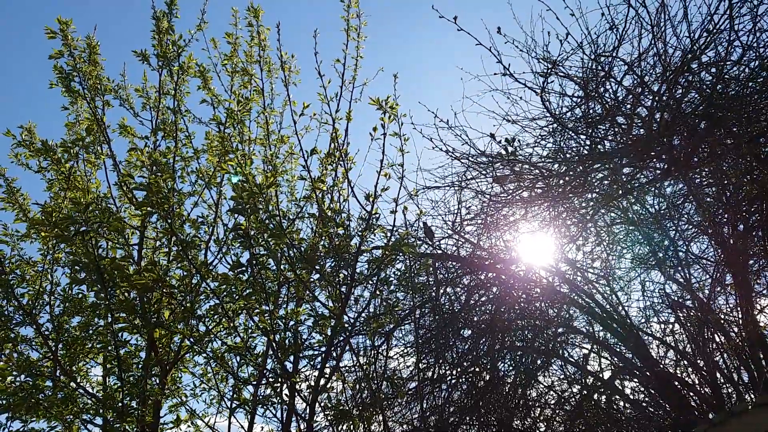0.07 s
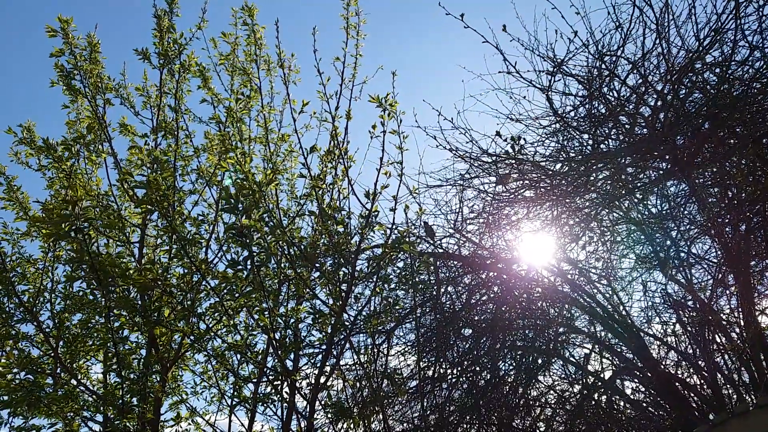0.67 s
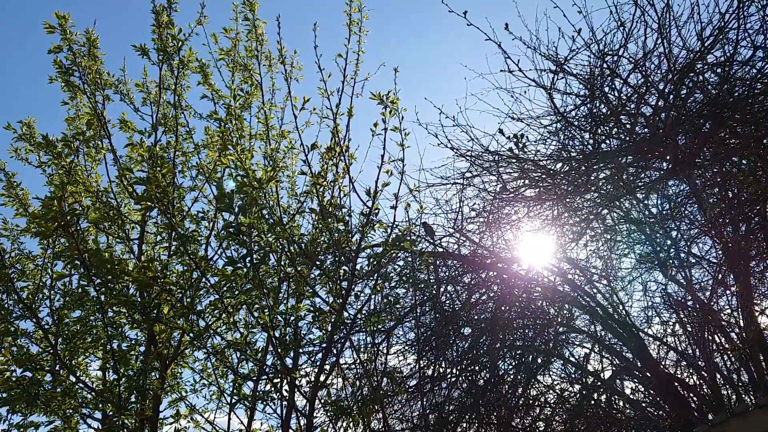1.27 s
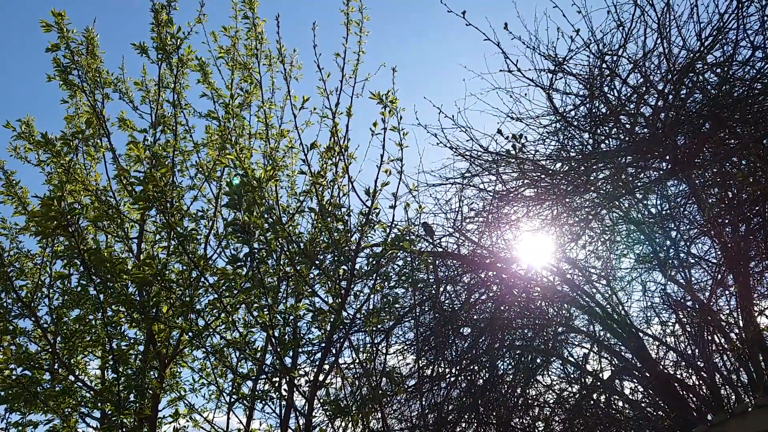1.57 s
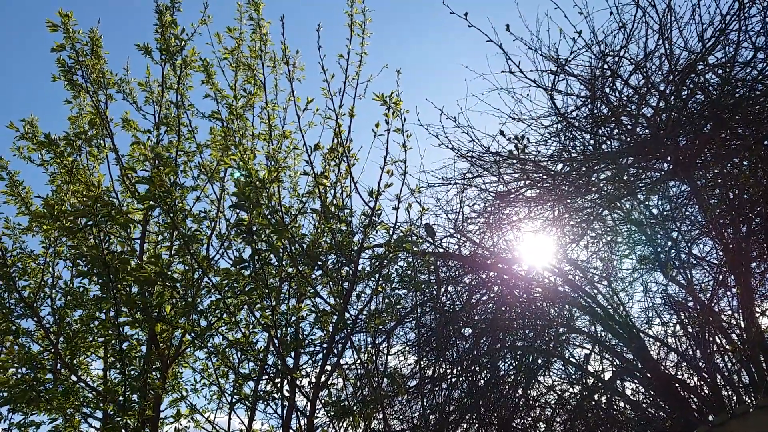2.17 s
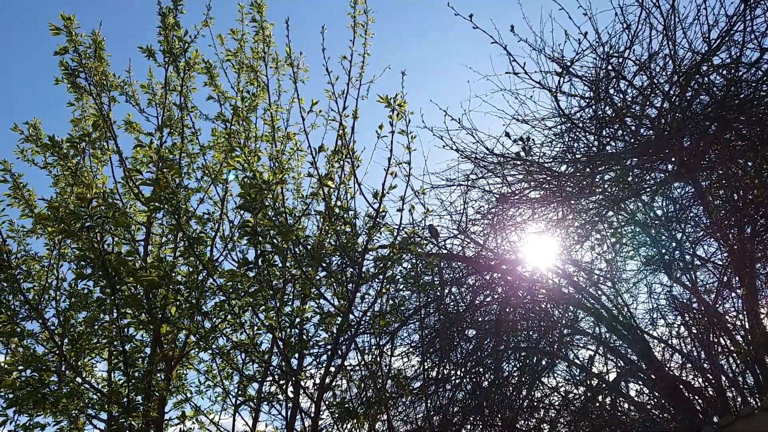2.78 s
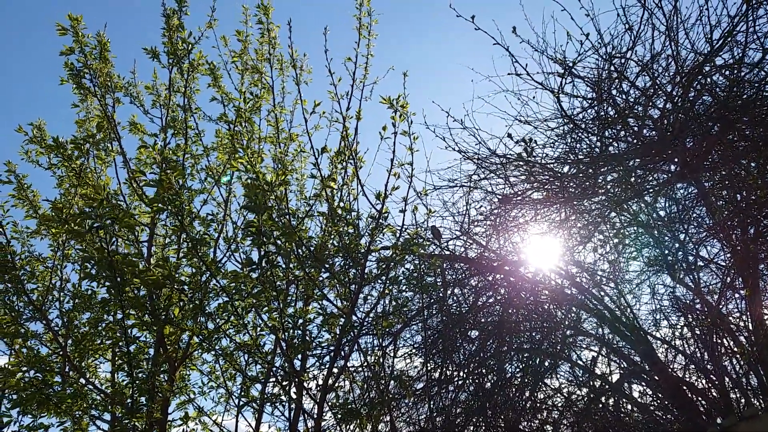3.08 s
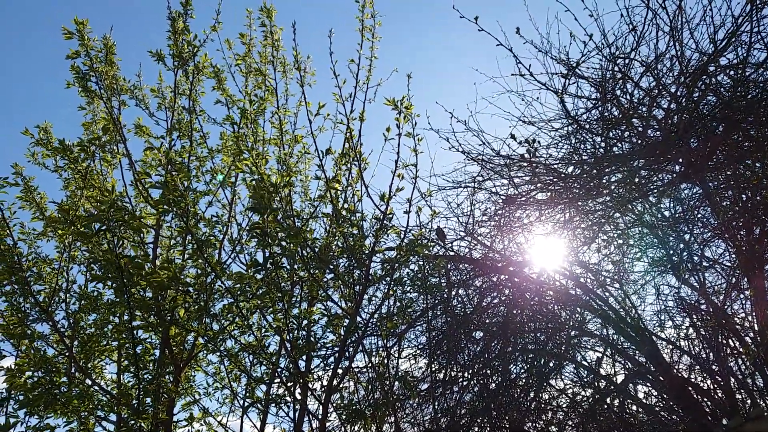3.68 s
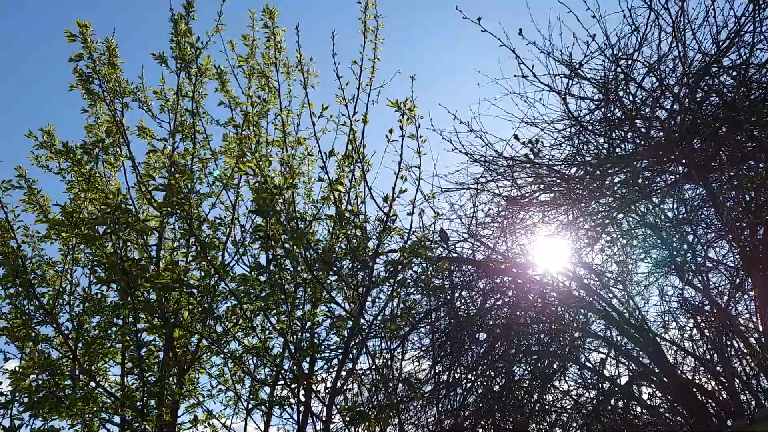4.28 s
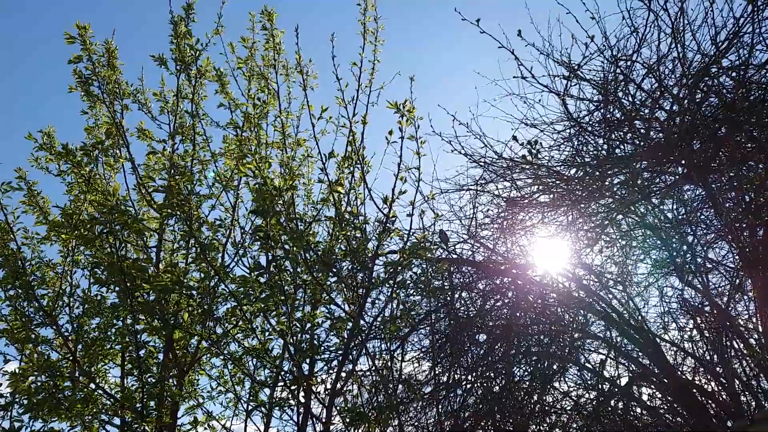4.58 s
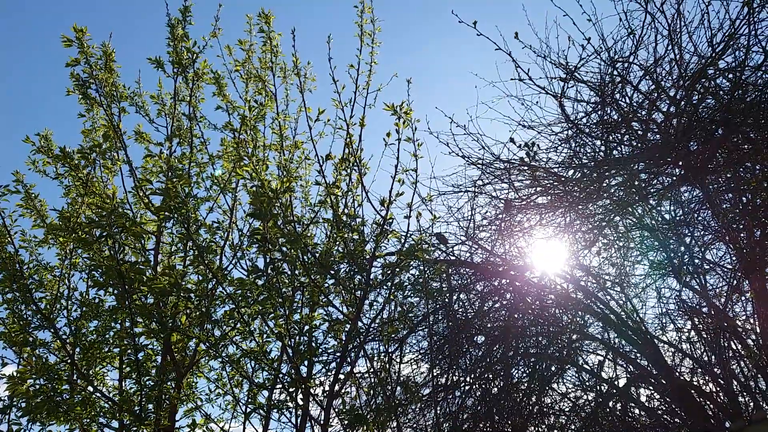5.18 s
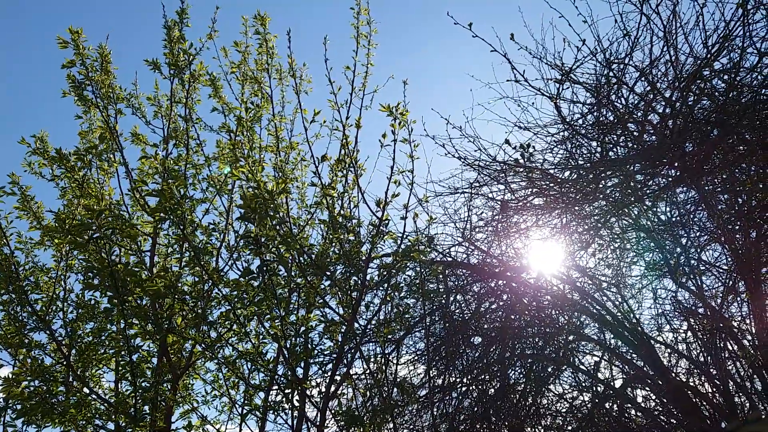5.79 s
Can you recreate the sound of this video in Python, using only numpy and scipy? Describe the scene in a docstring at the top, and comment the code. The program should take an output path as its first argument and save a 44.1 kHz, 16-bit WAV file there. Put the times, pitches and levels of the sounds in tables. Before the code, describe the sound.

A close bird gives two loud, thin, buzzy calls, with faint water drips, distant chirps and light wind in a garden.

```python
"""A garden. A bird close on the right gives two loud, thin calls, each a falling buzz, an arched whistle
and a harder buzz; a flutter in its throat chops the tone, and leaves and branches scatter it.
Other birds chirp farther off. Water drips and splashes faintly: drops tick, trapped bubbles ring.
Light wind rumbles on the left microphone over a low outdoor hush."""
import sys
import numpy as np
from scipy import signal
from scipy.fft import rfft, irfft, next_fast_len
from scipy.io import wavfile
from scipy.ndimage import uniform_filter1d

SR = 44100
rng = np.random.default_rng(int(sys.argv[2]) if len(sys.argv) > 2 else 0)


def to_wav(sig):
    """Store sig (one row per channel, or 1-D mono) as 16-bit WAV at the path in sys.argv[1].

    Samples outside -1..1 are clipped; the rate is SR.
    """
    pcm = np.clip(np.atleast_2d(sig), -1, 1) * 32767
    pcm = np.round(pcm).astype(np.int16)
    wavfile.write(sys.argv[1], SR, pcm.T)  # frames by channels


N = 261954
TIME = np.arange(N) / SR


def amp(db):
    """Decibels to gain."""
    return 10 ** (np.asarray(db) / 20)


def unit(x):
    """Scale to rms 1."""
    return x / np.sqrt(np.mean(x ** 2) + 1e-20)


def lookup(points, hz):
    """Interpolate a table on a log-frequency axis."""
    table_hz, value = np.transpose(points)
    return np.interp(np.log(hz + 1), np.log(table_hz + 1), value)


def colour(x, points):
    """Filter by a table of (frequency [Hz], gain [dB])."""
    size = next_fast_len(x.shape[-1] + 4096)
    gain = amp(lookup(points, np.fft.rfftfreq(size, 1 / SR)))
    return irfft(rfft(x, size) * gain, size)[..., :x.shape[-1]]


def add(mix, start_s, sound):
    """Mix a sound in at start_s."""
    part = mix[max(round(start_s * SR), 0):][:len(sound)]
    part += sound[:len(part)]


def drift(t, max_hz):
    """Smooth random wander, rms about 1."""
    hz, phase = max_hz * rng.uniform(.2, 1, (12, 1)), rng.random((12, 1))
    return np.sin(2 * np.pi * (hz * t + phase)).sum(0) / np.sqrt(6)


def ring(x, hz, width_hz):
    """One resonance."""
    return signal.lfilter(*signal.iirpeak(hz, hz / width_hz, SR), x)


def burst(decay_s):
    """Exponentially decaying noise."""
    return rng.standard_normal(1024) * np.exp(-TIME[:1024] / decay_s)


def impulses(per_s, spread_db):
    """Randomly timed impulses of uneven size."""
    sizes = amp(spread_db * np.minimum(rng.exponential(1, N), 3))
    return sizes * (rng.random(N) < per_s / SR)


def scatter(x, t60_table, delay_s, taps_per_s):
    """Echoes off branches: sparse taps that decay band by band."""
    taps = rng.standard_normal(SR) * (rng.random(SR) < taps_per_s / SR) * (TIME[:SR] > delay_s)
    hz, t, bands = signal.stft(taps, SR, nperseg=256)
    decay = amp(-60 * t / lookup(t60_table, hz)[:, None])
    tail = signal.istft(bands * decay, SR, nperseg=256)[1]
    return signal.fftconvolve(x, tail / np.linalg.norm(tail))[:N]


# left microphone relative to right: (frequency [Hz], gain [dB])
LEFT_SHADE = [(300, 9.5), (1000, -1.5), (2000, -21), (3000, -25), (4000, -13), (5600, -9), (6400, -36.5),
              (7000, -33), (8000, -8.5), (12000, -12), (16000, -16)]
# decay of tree echoes: (frequency [Hz], T60 [s])
TREE_T60 = [(500, 0.69), (3000, 0.38), (7000, 0.39), (14000, 0.26)]
def garden(x, near_db, far_db, left_far_db, near_t60_s=.023, right_lag_samples=13):
    """A source on the right: near twigs echo at once, farther trees from all sides."""
    near = [x + amp(near_db) * scatter(x, [(1000, near_t60_s)], delay_s=.0007, taps_per_s=1500)
            for _ in range(2)]
    far = [amp(far_db) * scatter(x, TREE_T60, delay_s=.013, taps_per_s=3000) for _ in range(2)]
    left = colour(near[0], LEFT_SHADE) + amp(left_far_db) * far[0]
    right = np.pad(near[1] + far[1], (right_lag_samples, 0))[:N]
    return np.array([left, right])


# outdoor noise spectrum: (frequency [Hz], gain [dB])
HUSH_SPECTRUM = [(100, 20.5), (250, -3), (500, 3.5), (950, 5), (1500, -0.5), (2500, -6.5), (4000, -16.5),
                 (5500, -18), (7000, -27.5), (8300, -47.5), (10000, -16.5), (15500, -22)]
def hush(level_db=-58, shared=.15, swell_db=1):
    """Distant outdoor noise, gently swelling."""
    noise = unit(colour(rng.standard_normal((3, N)), HUSH_SPECTRUM))
    left, right, both = noise * amp(level_db + swell_db * drift(TIME, 3.9))
    return np.array([left, right]) + shared * both


# turbulence spectrum: (frequency [Hz], gain [dB])
WIND_SPECTRUM = [(15, 0.5), (25, 1.5), (41, -1), (55, -5), (70, -18), (84, -14.5), (94, -4), (106, -13.5),
                 (135, -19), (165, -18.5), (250, -20.5), (400, -24), (900, -71)]
# turbulence on the left microphone: (time [s], level [dB])
WIND_LEVELS = [(0, -43.5), (.3, -52.5), (1.4, -45.5), (1.9, -47), (3.2, -48), (4.5, -48), (5.5, -47.5),
               (5.94, -47)]
# brief buffets: (time [s], envelope peak [dB], pitch [Hz])
WIND_BUFFETS = [(0.013, -30, 95), (0.666, -34.5, 49), (0.946, -34, 86), (1.765, -26, 76),
                (2.591, -31.5, 44.9), (4.104, -31.5, 45), (4.245, -30.5, 48), (5.456, -29, 50),
                (5.543, -29, 84.6)]
def wind(right_db=-14, buffet_sigma_s=.0038):
    """Low turbulence and short buffets, mostly on the left microphone."""
    turbulence = unit(colour(rng.standard_normal((2, N)), WIND_SPECTRUM))
    left, right = turbulence * amp(np.interp(TIME, *np.transpose(WIND_LEVELS)))
    for centre_s, db, hz in WIND_BUFFETS:
        t = TIME - centre_s
        left += amp(db) * np.exp(-.5 * (t / buffet_sigma_s) ** 2) * np.sin(2 * np.pi * hz * t)
    return np.array([left, amp(right_db) * right])


def thin_whistle(start_s=.0013, length_s=.2, hz=9200, db=-60, fade_db=-14, jitter=.0049):
    """A faint, very high whistle that holds its pitch and fades."""
    out, t = np.zeros(N), np.arange(0, length_s, 1 / SR)
    phase = 2 * np.pi * np.cumsum(hz * (1 + jitter * drift(t, 200))) / SR
    envelope = amp(db + fade_db * t / length_s) * signal.windows.tukey(len(t), .1)
    add(out, start_s, envelope * np.sin(phase))
    return np.array([colour(out, LEFT_SHADE), out])


# three-note phrase: (offset [s], length [s], start [Hz], middle [Hz], end [Hz], relative level [dB])
PHRASE_NOTES = [(0, .053, 2360, 2890, 3340, -48), (0.01, .08, 4050, 4500, 4090, -50),
                (.026, .108, 3150, 3790, 2530, -40.5)]
# each time it is sung: (time [s], gain [dB])
PHRASE_STARTS = [(1.899, -1), (3.657, -3)]
def phrase_notes():
    """A far bird sings one phrase twice."""
    return [(start_s + offset_s, *shape, db + gain_db)
            for start_s, gain_db in PHRASE_STARTS for offset_s, *shape, db in PHRASE_NOTES]


# quick chips: (time [s], relative level [dB])
TWITTER_CHIPS = [(4.964, -56), (4.997, -58), (5.089, -58), (5.134, -58), (5.196, -55), (5.241, -60),
                 (5.294, -47), (5.39, -52.5), (5.427, -62), (5.49, -56), (5.54, -55.5)]
def twitter_notes(length_s=.0205, first_hz=2358, climb_hz_per_s=433, sweep=.184):
    """Falling chips, each pitched a little above the last."""
    notes = []
    for start_s, db in TWITTER_CHIPS:
        hz = first_hz + climb_hz_per_s * (start_s - TWITTER_CHIPS[0][0])
        notes.append((start_s, length_s, hz * (1 + sweep), hz, hz * (1 - sweep), db))
    return notes


# far birds' slurs and, at .047 and .123 s, short rising plips of water drops:
# (time [s], length [s], start [Hz], end [Hz], relative level [dB])
SLURS_AND_PLIPS = [(.047, 0.005, 880, 1680, -34.5), (.068, 0.026, 3680, 1936, -44),
                   (.123, .015, 880, 1385, -35), (.154, 0.031, 3220, 2110, -51),
                   (.266, 0.067, 3505, 4510, -49.5), (.328, 0.043, 3240, 4540, -43),
                   (.345, .039, 2940, 2390, -40), (.635, 0.067, 3060, 4290, -49),
                   (.994, .07, 1923, 3166, -53), (1.067, 0.034, 2960, 2220, -53),
                   (1.383, 0.054, 2234, 3100, -48.5), (1.666, 0.028, 2580, 2110, -43.5),
                   (2.343, 0.062, 3304, 2810, -54), (2.476, .1, 3090, 2920, -63.5),
                   (4.15, .022, 1760, 2330, -43.5), (4.8, 0.0292, 968, 1640, -55),
                   (4.845, 0.015, 2370, 1620, -40.5), (5.592, 0.14, 4070, 4000, -66.5)]
# faint bird chatter: (time [s], length [s], relative level [dB])
CHATTER_BOUTS = [(0.217, .52, -57), (0.785, .34, -60.5), (4.42, .22, -64)]
def glide_notes(chatter_per_s=30, note_s=.045, low_hz=2193, high_hz=4304, max_sweep=.15, arch=1.03):
    """Slightly arched glides: bird slurs, water plips and bouts of random chatter."""
    glides = list(SLURS_AND_PLIPS)
    for bout_s, length_s, db in CHATTER_BOUTS:
        for slot_s in np.arange(bout_s, bout_s + length_s, 1 / chatter_per_s):
            late, pitch, slope = rng.random(3)
            hz = low_hz * (high_hz / low_hz) ** pitch
            sweep = max_sweep * (2 * slope - 1)
            glides.append((slot_s + late / chatter_per_s, note_s, hz * (1 - sweep), hz * (1 + sweep), db))
    return [(start_s, length_s, start_hz, arch * (start_hz + end_hz) / 2, end_hz, db)
            for start_s, length_s, start_hz, end_hz, db in glides]


def far_birds_and_plips(octave_db=-30, faint_db=-56, clear_db=-40, jitter=.018):
    """Far birds' whistles and rising plips of water drops; the trees blur fainter notes more."""
    clear, blurred = np.zeros((2, N))
    for start_s, length_s, *pitches_hz, db in phrase_notes() + twitter_notes() + glide_notes():
        t = np.arange(0, length_s, 1 / SR)
        blur = np.clip((clear_db - db) / (clear_db - faint_db), 0, 1)
        hz = np.polyval(np.polyfit([0, .5, 1], pitches_hz, 2), t / length_s)
        waver = jitter * (1 + 2 * blur) * drift(t, 400)
        phase = 2 * np.pi * np.cumsum(hz * (1 + waver)) / SR
        tone = np.sin(phase) + amp(octave_db) * np.sin(2 * phase)
        note = amp(db) * np.sin(np.pi * t / length_s) * tone
        add(clear, start_s, (1 - blur) * note)
        add(blurred, start_s, blur * note)
    return (garden(amp(2) * clear, near_db=-2, far_db=-9, left_far_db=-9)
            + garden(amp(-1) * blurred, near_db=9, far_db=1.5, left_far_db=-20))


def bubble(hz, t60_s, rise_octaves, onset_s):
    """A trapped bubble rings, its pitch sliding up as it nears the surface (down for a negative rise)."""
    t = np.arange(0, max(t60_s, .001), 1 / SR)
    phase = 2 * np.pi * np.cumsum(hz * 2 ** (rise_octaves * t / t60_s)) / SR
    envelope = amp(-60 * t / t60_s) * (1 - np.exp(-t / onset_s)) ** 2
    return np.sin(phase) * envelope / envelope.max()


def swarm(low_hz, high_hz, per_s, spread_db, ring_cycles, rise_octaves, onset_cycles, pitches):
    """Randomly timed bubbles of uneven size, ring time and glide, rms 1."""
    out = np.zeros(N)
    for hz in np.geomspace(low_hz, high_hz, pitches):
        births = impulses(per_s / pitches, spread_db)
        t60_s = ring_cycles / hz * rng.uniform(.082, 3.5)
        grain = bubble(hz, t60_s, rise_octaves * rng.uniform(-.45, 1), onset_cycles / hz)
        out += signal.oaconvolve(births, grain / np.linalg.norm(grain) * np.sqrt(hz))[:N]
    return unit(out)


def gurgle(envelope):
    """Larger bubbles swell softly and slide in pitch."""
    bubbles = swarm(800, 2500, per_s=700, spread_db=2.5, ring_cycles=19, rise_octaves=.18,
                    onset_cycles=2.8, pitches=24)
    return garden(bubbles * envelope * amp(-1.5), near_db=-6.5, far_db=-17.5, left_far_db=3.5)


# spray's tone colour, with the microphone's peak near 6.8 kHz and notch near 8.5 kHz:
# (frequency [Hz], gain [dB])
SPRAY_AND_MIC_COLOUR = [(300, -35.5), (500, -13.5), (1000, -11.5), (2000, 1.5), (3200, -0.5), (4800, -3),
                        (6700, 3), (7600, -5.5), (8400, -33.5), (9500, -13), (11000, -9), (15500, -9)]
def spray(envelope, snap_db=-2, snap_decay_s=.00092):
    """Many tiny bubbles, and sharp snaps where drops land."""
    fizz = swarm(1200, 15060, per_s=2600, spread_db=10, ring_cycles=46, rise_octaves=.69,
                 onset_cycles=.18, pitches=40)
    landings = impulses(per_s=170, spread_db=5.5)
    snaps = signal.oaconvolve(landings, np.exp(-TIME[:256] / snap_decay_s))[:N] * rng.standard_normal(N)
    drops = unit(colour(fizz + amp(snap_db) * unit(snaps), SPRAY_AND_MIC_COLOUR))
    return garden(drops * envelope * amp(9.5), near_db=-3, far_db=-20, left_far_db=-30)


# splashes: (time [s], hold [s], relative spray level [dB], relative gurgle level [dB])
SPLASH_EVENTS = [(-0, 0.17, -72.5, -57), (0.23, 0.34, -69, -53.5), (0.96, 0.3, -75, -59.5),
                 (1.669, 0.075, -66.5, -61.5), (2.658, 0.057, -65, -85.5), (2.995, .02, -49.5, -50.5),
                 (3.132, 0.032, -53.5, -62), (3.239, .2, -56.5, -64), (4.039, 0.24, -70, -65),
                 (4.704, 0.018, -65, -66.5), (4.812, 0.035, -69.5, -54.5), (5.282, 0.23, -77, -70),
                 (5.893, 0.01, -58, -55.5)]
def splashes(rise_db_per_s=500.5, fall_db_per_s=128, trickle_db=-82):
    """Each splash of spray and gurgle rises fast, holds and dies into a steady trickle."""
    power = np.full((2, N), amp(trickle_db) ** 2)
    for start_s, hold_s, spray_db, gurgle_db in SPLASH_EVENTS:
        t = TIME - start_s
        shape_db = -rise_db_per_s * np.maximum(-t, 0) - fall_db_per_s * np.maximum(t - hold_s, 0)
        power += amp([spray_db + shape_db, gurgle_db + shape_db]) ** 2
    spray_envelope, gurgle_envelope = np.sqrt(power)
    return spray(spray_envelope) + gurgle(gurgle_envelope)


# drops that trap a bubble: (time [s], relative peak [dB], pitch [Hz])
BUBBLE_DROPS = [(.2773, -43.5, 4170), (0.403, -46, 885), (.4763, -49, 1153), (0.5399, -42.5, 2260),
                (.599, -46.5, 1280), (.6377, -37.5, 2550), (1.6827, -39.5, 2286), (2.6398, -30, 1984),
                (2.6648, -41, 2560), (2.981, -37.5, 2710), (2.9986, -36, 1370), (3.034, -39, 2950),
                (3.0733, -39.5, 2610), (3.2114, -42, 1970), (3.3237, -38.5, 2270), (3.4411, -44, 3240),
                (3.8485, -44.5, 3200), (4.0257, -47, 2953), (4.1042, -39, 2930), (4.3018, -41, 2620),
                (4.3695, -50.5, 1765), (4.7004, -39, 2050), (4.7106, -42.5, 3660), (4.7329, -34.5, 1880),
                (4.8507, -52, 2000), (5.159, -44, 1666)]
def drop_bubbles():
    """One ringing bubble per drop; big, low ones start softly."""
    out = np.zeros(N)
    for start_s, db, hz in BUBBLE_DROPS:
        plink = bubble(hz, t60_s=.022, rise_octaves=.15, onset_s=.00046 * (1200 / hz) ** 2)
        add(out, start_s, amp(db) * plink)
    return out


def stray_ticks(count=7, from_s=3.85, db=-47, spread_db=2, low_hz=4850, high_hz=7230):
    """Fainter drops at random moments, as rows like TICK_DROPS."""
    late, size, pitch = rng.random((count, 3)).T
    start_s = from_s + (TIME[-1] - from_s) * (np.arange(count) + late) / count
    return list(zip(start_s, db + spread_db * (2 * size - 1), low_hz + (high_hz - low_hz) * pitch))


# drops that only tick: (time [s], relative peak [dB], centre [Hz])
TICK_DROPS = [(2.6397, -36, 6300), (2.653, -30.5, 4600), (2.667, -28.5, 6700), (2.6991, -35, 6700),
              (2.7105, -26, 6170), (2.8136, -36.5, 4850), (2.897, -35, 5070), (2.9106, -26.5, 6600),
              (2.9553, -26, 5960), (2.9952, -25, 6440), (3.1205, -29, 4940), (3.157, -26.5, 6100),
              (3.2035, -30, 4150), (3.274, -31, 7000), (3.3223, -30.5, 4500), (3.404, -27, 7100),
              (3.4405, -29.5, 6800), (3.4938, -30.5, 6600), (3.5395, -36.5, 6200), (3.6834, -32.5, 5410),
              (4.0492, -34, 7000), (4.1044, -39.5, 6650), (4.1383, -26.5, 6670), (4.234, -40.5, 4470),
              (4.694, -36, 3770), (4.7651, -32, 6700), (4.832, -39, 5000), (4.8953, -29.5, 6640),
              (5.28, -35, 5300), (5.3158, -30, 6900), (5.375, -37.5, 5900), (5.4097, -31, 7670),
              (5.6779, -37.5, 6500), (5.8736, -37, 6060)]
def drop_ticks(width_hz=1700, splat_db=-5):
    """A broad splat on landing, then a short bright ring."""
    out = np.zeros(N)
    for start_s, db, hz in TICK_DROPS + stray_ticks():
        splat = colour(burst(decay_s=.00069), SPRAY_AND_MIC_COLOUR)
        tick = ring(ring(burst(decay_s=.0011), hz, width_hz), hz, width_hz)
        add(out, start_s, amp(db) * (tick / abs(tick).max() + amp(splat_db) * splat / abs(splat).max()))
    return out


# drops that click: (time [s], relative peak [dB])
CLICK_DROPS = [(.638, -32.5), (2.0677, -35.5), (2.128, -41.5), (3.335, -32.5), (3.832, -33), (5.45, -45.5)]
def drop_clicks():
    """Dry, dull clicks: noise bursts through a broad resonance."""
    out = np.zeros(N)
    for start_s, db in CLICK_DROPS:
        click = ring(burst(decay_s=.0013), hz=1300, width_hz=2000)
        add(out, start_s, amp(db) * click / abs(click).max())
    return out


def drips():
    """Single drops with their garden echoes."""
    drops = amp(5) * drop_bubbles() + amp(-1.5) * drop_ticks() + amp(-.5) * drop_clicks()
    return garden(drops, near_db=-1.5, far_db=-18.5, left_far_db=-23, near_t60_s=.031)


def syllable(contour, octave_db, flutter_hz=144, swing=.076, sway=.12, sharpness=9.8, rasp_db=-17):
    """A throat flutter chops a whistle into pulses and swings its pitch.
    Contour rows: (time [s], pitch [Hz], level [dB], buzz [0-1])."""
    times_s, *columns = np.transpose(contour)
    t = np.arange(times_s[0], times_s[-1], 1 / SR)
    hz, level_db, buzz = (np.interp(t, times_s, column) for column in columns)
    flutter = 2 * np.pi * flutter_hz * (t - t[0]) + .11 * drift(t, 60)
    # a hard buzz also sways up and down by turns between pulses
    bend = buzz * swing * np.sin(flutter) + buzz ** 2 * sway * np.sin(flutter / 2)
    jitter = .012 * (.23 + buzz) * drift(t, 700)
    phase = 2 * np.pi * np.cumsum(hz * (1 + bend + jitter)) / SR
    pulses = 1 - .72 * buzz + .67 * buzz * unit(np.exp(sharpness * np.cos(flutter)))
    breath = unit(uniform_filter1d(rng.standard_normal(len(t)), size=14))
    fundamental = (pulses + amp(rasp_db) * buzz ** 2 * breath) * np.sin(phase)
    octave = amp(octave_db + 10.8 * buzz) * np.sqrt(pulses) * np.sin(2 * phase)
    envelope = np.sqrt(2) * amp(level_db) * signal.windows.tukey(len(t), .03)
    return times_s[0], envelope * (fundamental + octave)


# buzzes: (time at top [s], fall [s], top [Hz], end [Hz], relative level [dB], fade [dB], buzz [0-1],
#          lead-in [s], base octave level [dB])
FALLING_BUZZES = [(.385, .1, 7720, 6380, -20.5, -13.5, 0.7, .075, -21.5),
                  (.697, 0.082, 7440, 5396, -21, -21.5, .97, .0255, -23),
                  (1.132, .108, 8360, 5665, -21, -17.5, 0.71, .078, -24),
                  (1.447, 0.081, 7730, 5064, -22, -14.5, 0.87, .022, -29.5)]
def falling_buzzes(lead_hz=6070, flick_hz=6900, flick_s=.016):
    """A soft, clear lead-in, a flick upward and a buzzing fall."""
    out = np.zeros(N)
    for top_s, fall_s, top_hz, end_hz, db, fade_db, buzz, lead_s, octave_db in FALLING_BUZZES:
        contour = [(top_s - lead_s, lead_hz, db - 39.5, .1),
                   (top_s - flick_s, flick_hz, db - 14, .1),
                   (top_s, top_hz, db + 1, buzz),
                   (top_s + .26 * fall_s, top_hz + .45 * (end_hz - top_hz), db, buzz),
                   (top_s + fall_s, end_hz, db + fade_db, buzz)]
        add(out, *syllable(contour, octave_db))
    return out


# whistles: (time [s], length [s], pitch [Hz], relative level [dB], fade [dB], sag [Hz],
#            base octave level [dB])
ARCHED_WHISTLES = [(0.493, .173, 7043, -14.5, -1, -1.5, -22.5), (1.248, .192, 7043, -14, -8, 352.5, -28)]
def arched_whistles(scoop_s=.055, release_s=.023, buzz=.48):
    """A swelling scoop upward, a hold where effort slackens midway, and a quick release."""
    out = np.zeros(N)
    for start_s, length_s, hz, db, fade_db, sag_hz, octave_db in ARCHED_WHISTLES:
        top_s, hold_end_s = start_s + scoop_s, start_s + length_s - release_s
        contour = [(start_s, .755 * hz, db - 25.5, .1),
                   (start_s + .66 * scoop_s, .93 * hz, db - 2.5, buzz),
                   (top_s, hz, db, buzz),
                   ((top_s + hold_end_s) / 2, hz - sag_hz / 2, db + fade_db / 2 - 3, buzz),
                   (hold_end_s, hz - sag_hz, db + fade_db, buzz),
                   (start_s + length_s, .92 * (hz - sag_hz), db + fade_db - 17.5, buzz)]
        add(out, *syllable(contour, octave_db))
    return out


# calls' tone colour, the bird's resonance with the microphone's notch near 8.5 kHz:
# (frequency [Hz], gain [dB])
CALL_AND_MIC_COLOUR = [(4000, -5.5), (5500, -6.5), (6900, -3.5), (7700, -9.5), (8600, -14), (9500, -9),
                       (11000, 4.5), (14000, -11.5), (16000, -11.5)]
def near_bird():
    """Two calls, coloured by bird and microphone, scattered by the garden."""
    song = amp(1) * colour(falling_buzzes() + arched_whistles(), CALL_AND_MIC_COLOUR)
    return garden(song, near_db=-5, far_db=-11.5, left_far_db=-21.5, near_t60_s=.12)


def scene():
    """All sources, stereo."""
    return near_bird() + thin_whistle() + drips() + splashes() + wind() + hush() + far_birds_and_plips()


def record(dry, cutoff_hz=16000):
    """The recorder's band limit."""
    lowpass = signal.firwin(511, cutoff_hz, window=("kaiser", 9), fs=SR)
    return signal.oaconvolve(dry, lowpass[None], "same")


dry = scene()
out = record(dry)
to_wav(out)
```